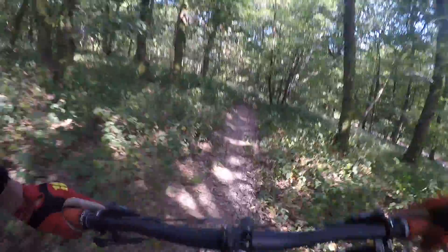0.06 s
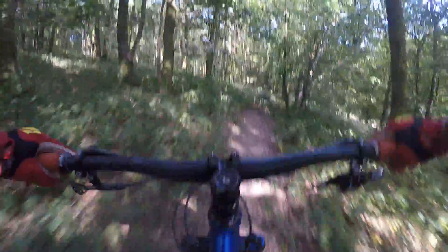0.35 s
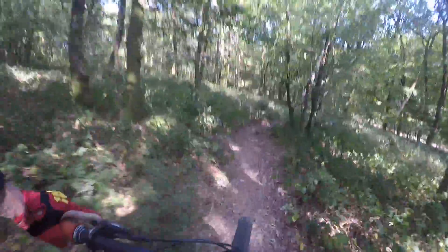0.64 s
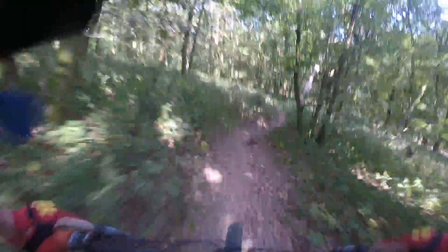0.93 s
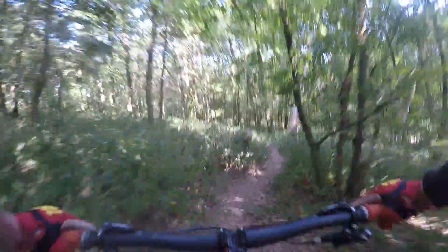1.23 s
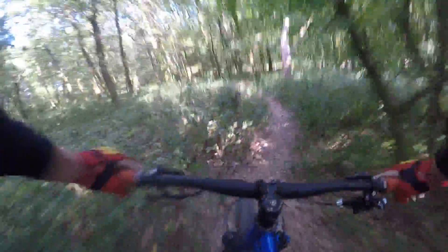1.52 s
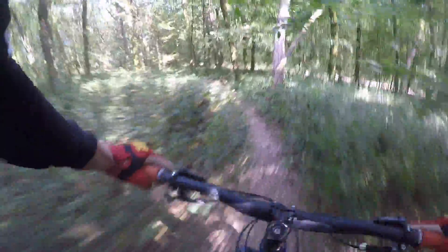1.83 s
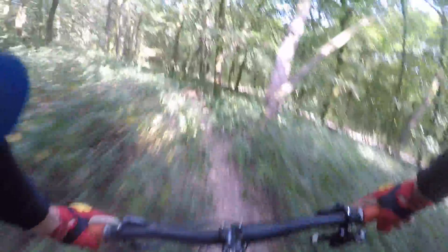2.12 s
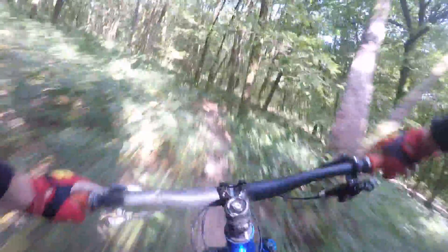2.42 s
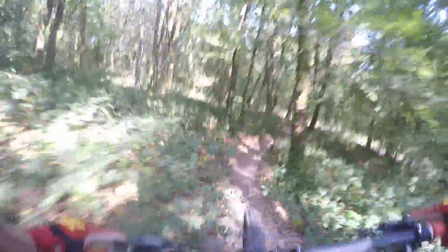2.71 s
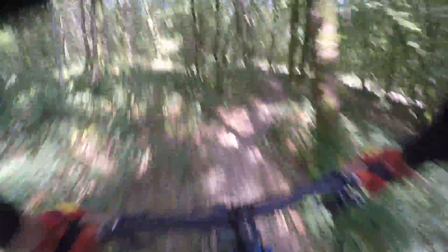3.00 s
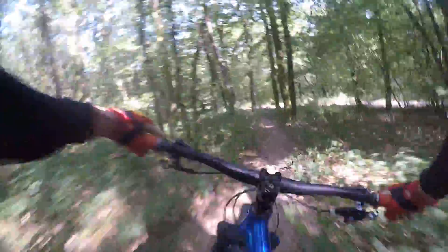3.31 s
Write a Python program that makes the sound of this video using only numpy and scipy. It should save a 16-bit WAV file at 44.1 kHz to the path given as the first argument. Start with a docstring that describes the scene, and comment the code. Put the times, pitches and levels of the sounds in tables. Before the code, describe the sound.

A mountain bike rattles and knocks down a dirt trail, with tyre hiss and wind rumble.

```python
"""Wind rumble and tyre hiss, then hard knocks: a mountain bike rolls fast down a dirt forest trail.
Air buffets the rider's camera microphone and bumps heave it. Tyres rub dirt and crush grit,
freewheel pawls whirr, leaves brush past. Bumps ring the frame, slips make it judder,
chain and cables tick on metal. The hardest knocks overload the recorder."""
import sys
import numpy as np
from scipy import signal
from scipy.fft import rfft, irfft
from scipy.io import wavfile

SR = 44100
rng = np.random.default_rng(int(sys.argv[2]) if len(sys.argv) > 2 else 0)


def wrap_up_sound(samples):
    """Save the sound to the file named by the first command line argument, as 16-bit audio."""
    columns = np.atleast_2d(samples).T
    # keep every value between -1 and 1, then stretch to whole-number steps
    tamed = np.clip(columns, -1, 1)
    steps = np.round(tamed * 32767).astype(np.int16)
    wavfile.write(sys.argv[1], SR, steps)


N = 156555

# rolling noise on dirt (time [s], hiss level [dB], fizz level [dB])
ROLL_LEVELS = [(0.0, -46, -58), (0.17, -50.5, -58), (0.49, -45.5, -56.5), (0.56, -40.5, -53.5),
               (0.71, -51, -60.5), (0.93, -49.5, -64.5), (1.06, -45, -56), (1.19, -53, -64),
               (1.4, -58.5, -66.5), (1.62, -49, -58.5), (1.8, -48.5, -60), (2.03, -48.5, -59),
               (2.17, -47.5, -58), (2.38, -46, -55), (2.52, -42, -54.5), (2.66, -39, -53),
               (2.8, -46.5, -52.5), (2.85, -44.5, -52), (2.97, -55.5, -64), (3.05, -59, -70),
               (3.55, -59, -69.5)]
# tyre and leaf hiss spectrum (frequency [Hz], level [dB])
HISS_SPECTRUM = [(100, -29), (300, 7), (600, 2), (1100, 2), (1800, -4.5), (2300, -2), (2900, -5),
                 (3700, -2.5), (4500, -2), (5200, -20.5), (6000, -22.5), (6900, -14), (7800, -43),
                 (15000, -61)]


def amp(db):
    """Decibels to gain."""
    return 10 ** (np.asarray(db) / 20)


def unit(x):
    """Scale to unit rms."""
    return x / np.sqrt(np.mean(x ** 2) + 1e-20)


def add(mix, time_s, sound):
    """Mix a sound in at time_s."""
    start = round(time_s * SR)
    sound = sound[max(-start, 0):]
    part = mix[max(start, 0):][:len(sound)]
    part += sound[:len(part)]


def curve(rows, column=1):
    """Table column interpolated to every sample."""
    rows = np.array(rows)
    return np.interp(np.arange(N) / SR, rows[:, 0], rows[:, column])


def colour(x, spectrum):
    """Filter by a spectrum table; unit rms."""
    hz, db = np.transpose(spectrum)
    bins_hz = np.fft.rfftfreq(len(x), 1 / SR)
    gain = amp(np.interp(np.log(bins_hz + 1), np.log(hz), db))
    return unit(irfft(rfft(x) * gain, len(x)))


def wander(rate_hz):
    """Random drift, mostly below rate_hz; unit rms."""
    rolloff = 1 + (np.fft.rfftfreq(N, 1 / SR) / rate_hz) ** 2
    return unit(irfft(rfft(rng.standard_normal(N)) / rolloff, N))


def ring(modes, t, scatter_db, detune):
    """Decaying modes; level and pitch vary per blow."""
    out = np.zeros(len(t))
    for hz, db, t60_s in modes:
        decay = amp(db + scatter_db * rng.standard_normal() - 60 * t / t60_s)
        detuned_hz = hz * (1 + detune * rng.standard_normal())
        out += decay * np.sin(2 * np.pi * detuned_hz * t)
    return out


def wind():
    """Air buffets the moving microphone: a lumpy rumble."""
    # wind strength (time [s], level [dB])
    levels = [(0.0, -29), (0.17, -35.5), (0.22, -32), (0.44, -28.5), (0.54, -22.5), (0.69, -32),
              (0.72, -20.5), (0.79, -35), (1.18, -17), (1.23, -39), (1.45, -40.5), (1.62, -28.5),
              (1.7, -31), (2.93, -28), (3.01, -26), (3.17, -38.5), (3.2, -33), (3.55, -44)]
    # buffeting spectrum (frequency [Hz], level [dB])
    spectrum = [(8, 2.5), (18, 7), (32, -2), (60, -8), (120, -15), (250, -31), (500, -57), (1500, -82)]
    gain_db, gust_db = 7, 2.5
    rumble = colour(rng.standard_normal(N), spectrum)
    return rumble * amp(gain_db + curve(levels) + gust_db * wander(rate_hz=36))


def heaves():
    """Each bump swings the camera briefly: a low pulse."""
    # camera swings (peak time [s], frequency [Hz], level [dB], half-width [s])
    swings = [(0.258, 41, -12, 0.028), (0.529, 15, -7.5, 0.019), (0.574, 33, -3.5, 0.014),
              (.725, 130, -10, 0.0034), (0.908, 42, -14, 0.008), (1.041, 28, 3, 0.0059),
              (1.078, 17, -10.5, 0.013), (1.152, 42.6, -7.5, 0.027), (1.614, 47.6, -9, 0.017),
              (1.948, 41.4, -11.5, 0.015), (2.277, 33, -16.5, 0.014), (2.425, 110, -15, 0.012),
              (2.577, 26, -11.5, 0.034), (2.645, 39, -7.5, 0.02), (2.699, 26.8, -9, 0.072),
              (2.79, 113, -14, 0.0049), (3.01, 66, -7.5, 0.015), (3.217, 122, -16.5, 0.0072),
              (3.282, 28, -16, 0.034)]
    out, t = np.zeros(N), np.arange(-SR // 5, SR // 5) / SR
    for time_s, hz, db, half_width_s in swings:
        envelope = amp(db) / np.cosh(1.44 * t / half_width_s)
        add(out, time_s + t[0], envelope * np.cos(2 * np.pi * hz * t))
    return out


def leaves():
    """Leaves brush the bike in short swells of hiss."""
    # brushes (peak time [s], half-width [s], level [dB])
    swells = [(0.292, 0.057, -42), (0.944, 0.036, -36.5), (1.02, 0.0058, -34), (1.132, 0.014, -31)]
    t = np.arange(N) / SR
    envelope = sum(amp(db) * np.exp(-((t - time_s) / half_s) ** 2) for time_s, half_s, db in swells)
    return colour(rng.standard_normal(N), HISS_SPECTRUM) * envelope


def freewheel():
    """Pawls drop unevenly over the ratchet teeth; level follows the tyre fizz."""
    # coasting speed (time [s], click rate [Hz])
    click_rates = [(0, 38), (.3, 39), (.55, 48), (1.2, 52), (1.38, 36), (1.48, 43), (1.62, 31), (1.76, 33),
                   (1.9, 29), (2.02, 56), (2.3, 79), (3.55, 41)]
    # pawl click spectrum (frequency [Hz], level [dB])
    spectrum = [(2000, -23), (3900, 13), (5300, 6.5), (6600, 10.5), (8000, 6.5), (13200, -2), (15200, -11),
                (15800, -37.5)]
    gain_db, spread_db, decay_s = 2, 3, .015
    rate_hz = curve(click_rates) * (1 + .13 * wander(rate_hz=60))
    since_click_s = np.cumsum(rate_hz) / SR % 1 / rate_hz
    clicks = colour(rng.standard_normal(N) * np.exp(-since_click_s / decay_s), spectrum)
    return clicks * amp(gain_db + curve(ROLL_LEVELS, column=2) + spread_db * wander(rate_hz=25))


def tyres():
    """Knobs rub dirt and crush grit: hiss with a fine fizz on top."""
    # fizz spectrum (frequency [Hz], level [dB])
    fizz_spectrum = [(3000, -27), (5500, 29), (6900, -11), (7700, 7.5), (9000, 12.5), (10400, 17),
                     (11500, 10), (13000, 16.5), (14000, 6), (15200, 15), (15700, -44)]
    hiss_db, fizz_db = 4.5, -5
    grains_per_s, spread_db = 520, .5
    sizes = amp(spread_db * np.minimum(rng.exponential(1, N), 5))
    grit = unit(sizes * rng.choice([-1, 1], N) * (rng.random(N) < grains_per_s / SR))
    flicker_db = 2.6 * wander(rate_hz=70)
    hiss = colour(rng.standard_normal(N) + .93 * grit, HISS_SPECTRUM)
    fizz = colour(rng.standard_normal(N) + .25 * grit, fizz_spectrum)
    hiss *= amp(hiss_db + curve(ROLL_LEVELS, column=1) + flicker_db)
    fizz *= amp(fizz_db + curve(ROLL_LEVELS, column=2) + flicker_db)
    return hiss + fizz


def ticks():
    """Chain and cables tap on metal: a noise burst and a bright ring."""
    # taps (time [s], level [dB])
    taps = [(0.496, -24), (0.5457, -46), (0.5916, -29.5), (0.8983, -33.5), (0.9472, -22), (1.3811, -32.5),
            (2.416, -43), (2.5965, -25), (2.669, -31), (2.8464, -24.5), (3.28, -51)]
    # metal modes (frequency [Hz], level [dB], t60 [s])
    modes = [(3926, 18, 0.049), (5230, 13, 0.017), (7520, 21, .03), (9600, -11, 0.012), (13600, 3, .015),
             (14700, -5, .012)]
    # contact spectrum (frequency [Hz], level [dB])
    spectrum = [(1500, 2), (4000, 3), (8000, -7), (13000, -4), (16000, -16)]
    gain_db, contact_s = 1, .0028
    out, t = np.zeros(N), np.arange(SR // 20) / SR
    for time_s, db in taps:
        contact = rng.standard_normal(len(t)) * np.exp(-t / contact_s)
        metal = ring(modes, t, scatter_db=2, detune=.03)
        ringing = unit(signal.fftconvolve(contact, metal)[:len(t)])
        tick = ringing + 2 * colour(contact, spectrum)
        add(out, time_s, amp(gain_db + db) * tick / abs(tick).max())
    return out


def judders():
    """Quick uneven slips shake the bike's low resonances."""
    # spells of judder (start [s], length [s], level [dB])
    spells = [(0.395, 0.023, -36), (0.548, 0.017, -36), (0.614, 0.023, -37.5), (0.653, 0.0295, -33.5),
              (1.114, 0.08, -30.5), (1.141, 0.031, -24.5), (1.34, 0.022, -43), (1.999, 0.0083, -24),
              (2.009, 0.032, -24.5), (2.101, 0.021, -25.5), (2.119, 0.071, -36.5), (2.274, 0.016, -29.5),
              (2.286, 0.023, -30), (2.357, 0.059, -25.5), (3.473, 0.056, -43.5), (3.532, 0.053, -38.5)]
    # bike resonances (centre [Hz], width [Hz], level [dB])
    resonances = [(459, 150, 9.5), (638, 98, 8), (770, 43, 6), (1047, 550, -3), (1455, 73, 0),
                  (2250, 700, -13.5)]
    out, t = np.zeros(N), np.arange(SR // 5) / SR
    hz = np.fft.rfftfreq(len(t), 1 / SR)
    body = sum(amp(db) / (1 + 2j * (hz - centre) / width) ** 2 for centre, width, db in resonances)
    for start_s, length_s, db in spells:
        arch = np.sqrt(abs(np.sin(np.pi * np.minimum(t / length_s, 1))))
        slips = rng.standard_normal(len(t)) * arch
        shake = unit(irfft(rfft(slips) * body, len(t)))
        add(out, start_s - .003, amp(db) * np.sqrt(length_s / t[-1]) * shake)
    return out


def knocks():
    """A gritty contact rings the frame, with loose clatter and a short echo; tone varies per blow."""
    # bumps (time [s], level [dB], then relative band levels: thud, body, clack, ring, crack [dB])
    bumps = [(0.117, -24, -4.5, -3, -11.5, -15, -29), (0.327, -12.5, -8, -7, -11, -32, -25),
             (0.383, -3.5, -20, -8.5, -20.5, -27.5, -33.5), (0.485, -20, -5, -7.5, -16, -25, -20),
             (0.551, -17, -24, -4, -34, -43, -37), (0.591, -19.5, -25, -3, -14, -22, -24),
             (0.716, -7.5, -6, 0, -14, -6, -2), (0.729, -23.5, 7, -26, -11, -34, -12),
             (0.771, -22, -15, -6.5, -32, -14, -19), (1.11, -12, -7.5, -5.5, -8.5, -17, -22),
             (1.148, 4.5, -17, -20.5, -13, -14.5, -22), (1.165, 0, -11.5, -13, -21, -16, -15.5),
             (1.18, -18.5, 2.5, -7, -15, -28, -7), (1.206, -14.5, -12.5, -12.5, -10.5, -18, -13.5),
             (1.986, -13, -13, -6, -14.5, -24, -44), (2.097, -9, -10, -9, -10.5, -17, -24),
             (2.151, -17, -13, -9, -14, -34, -17), (2.415, -4, -9.5, -16, -18, -16.5, -12),
             (2.429, -14.5, -10, -7.5, -13.5, -34, -21), (2.522, -25, -14, -2.5, -36, -24, -29),
             (2.628, -20, -5, -6, -14, -34, -34), (2.639, -19, -3, -17, -14.5, -24, -32),
             (2.68, -16, -16, -16, -32, -32, -9.5), (2.705, -13, -43, -4.5, -5, -18, -28),
             (2.711, -7, -12, -9.5, -21, -24, -15), (2.832, -15, -8.5, -12, -35, -14, -14),
             (2.96, -14, -7, -13, -7, -16, -12.5), (2.978, 3, -35, -5, -6, -19.5, -16),
             (3.007, 0, -6.5, -22, 0.5, -8.5, -13), (3.051, -26.5, -29, -3, -9.5, -13, -31),
             (3.205, -34.5, 7.5, -6.5, -13, -20, -23), (3.221, -28.5, -8, -1.5, -2, -12, -15),
             (3.279, -30, -4, -11, -9, -20, -6), (3.366, -28, -2.5, -10, -14, -34, -23)]
    # edges of the five bands (frequency [Hz])
    edges_hz = [130, 450, 1000, 1900, 2600, 17000]
    # frame modes (frequency [Hz], level [dB], t60 [s])
    modes = [(162.5, -4, 0.041), (237.6, 2.5, 0.012), (407, -10, 0.021), (641, -6, 0.058),
             (772.5, 5.5, 0.022), (1084, -11, 0.045), (1335, 4, 0.013), (1490, -5, 0.034),
             (1775, -7, 0.016), (1930, 1, 0.022), (2288, -4, 0.046), (2375, -10, 0.046), (2667, -12, 0.046),
             (3500, -6.5, 0.0074), (4430, -16.5, 0.024), (6720, -35, .012)]
    # clatter spectrum (frequency [Hz], level [dB])
    clatter_spectrum = [(100, -3.5), (350, -10.5), (800, 2.5), (2400, 3), (4500, 1), (5200, -27.5),
                        (6100, -47.5), (6900, -19.5), (8000, -38.5), (16000, -28.5)]
    # echo spectrum (frequency [Hz], level [dB])
    echo_spectrum = [(200, -17), (2000, -3.5), (8000, -27)]
    gain_db, clatter_db, echo_db = -17.5, 13.5, -20
    contact_s, clatter_s, echo_s = .0014, .0032, .019  # decay times
    delay_s = .0008
    out, t = np.zeros(N), np.arange(SR // 5) / SR
    bands = [signal.butter(5, pair, "band", fs=SR, output="sos") for pair in zip(edges_hz, edges_hz[1:])]
    for time_s, level_db, *bands_db in bumps:
        grit, clatter_noise, echo_noise = rng.standard_normal((3, len(t)))
        contact = (t == 0) + .41 * grit * np.exp(-t / contact_s)
        frame = ring(modes, t, scatter_db=2, detune=.01)
        clatter = amp(clatter_db) * colour(clatter_noise, clatter_spectrum) * np.exp(-t / clatter_s)
        echo = amp(echo_db) * colour(echo_noise, echo_spectrum) * np.exp(-t / echo_s)
        blow = signal.fftconvolve(contact, frame)[:len(t)] + clatter + echo
        for sos, band_db in zip(bands, bands_db):
            band = unit(signal.sosfilt(sos, blow))
            add(out, time_s + delay_s, amp(gain_db + level_db + band_db) * band)
    return out


def scene():
    """Mono sum at the microphone."""
    return (knocks() + judders() + ticks() + tyres() + freewheel() + leaves() + wind() + heaves())[None]


def record(dry):
    """DC block, soft clip of the loudest peaks, low-pass."""
    highpass_hz, ceiling, lowpass_hz = 4, .97, 16000
    blocked = signal.lfilter(*signal.butter(1, highpass_hz, "high", fs=SR), dry)
    clipped = blocked / (1 + abs(blocked / ceiling) ** 8) ** (1 / 8)
    lowpass = signal.firwin(401, lowpass_hz, window=("kaiser", 8), fs=SR)
    return signal.oaconvolve(clipped, lowpass[None], "same")


dry = scene()
out = record(dry)
wrap_up_sound(out)
```